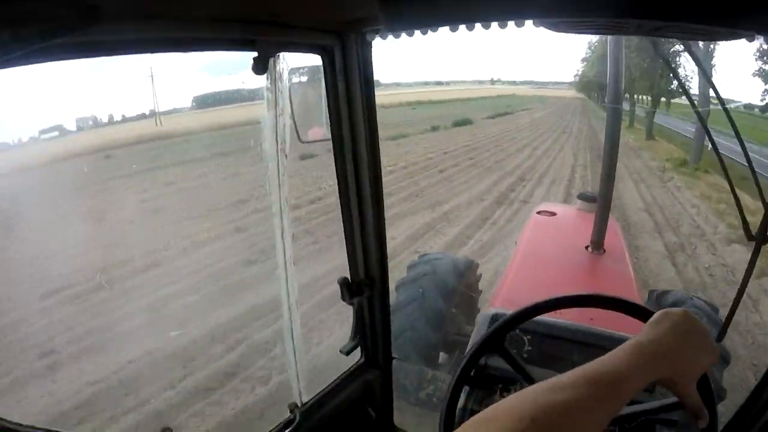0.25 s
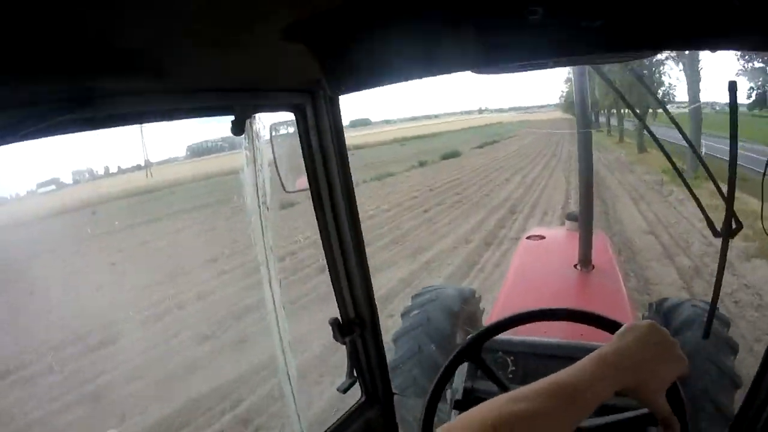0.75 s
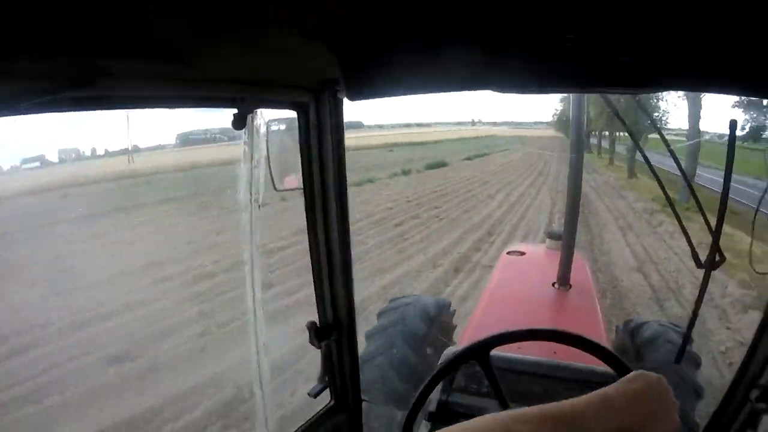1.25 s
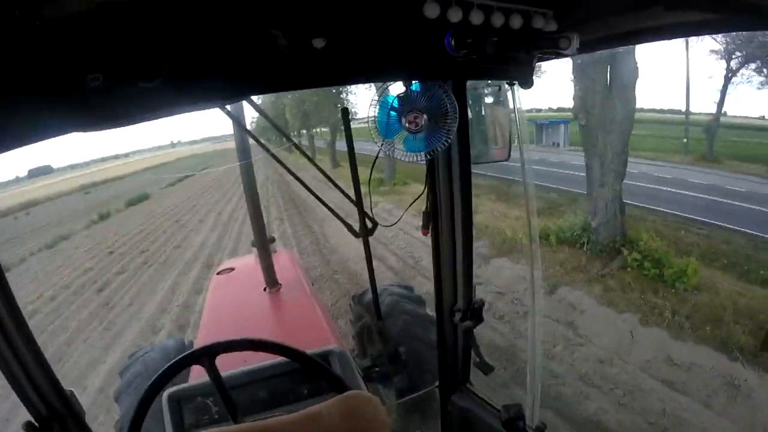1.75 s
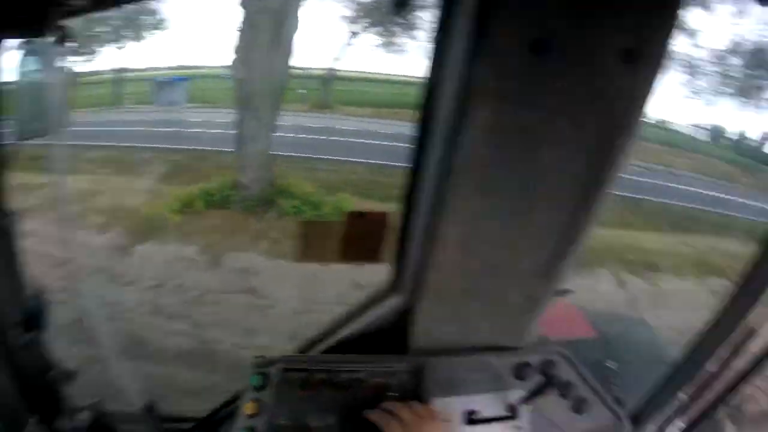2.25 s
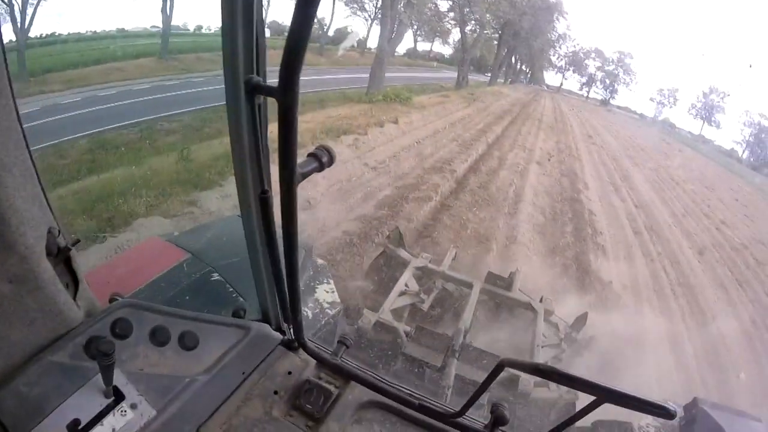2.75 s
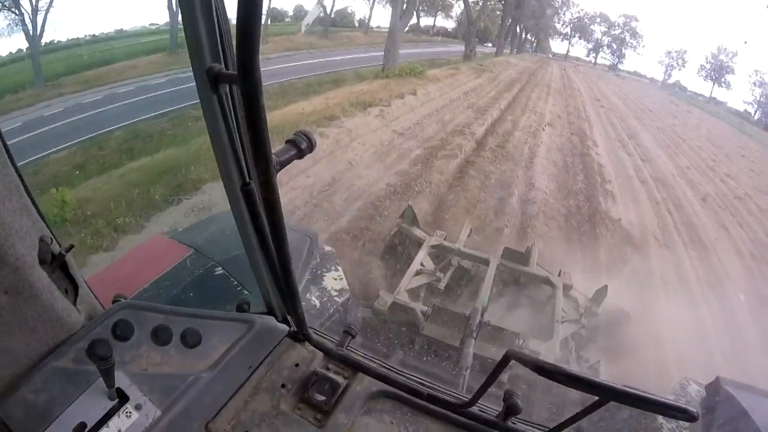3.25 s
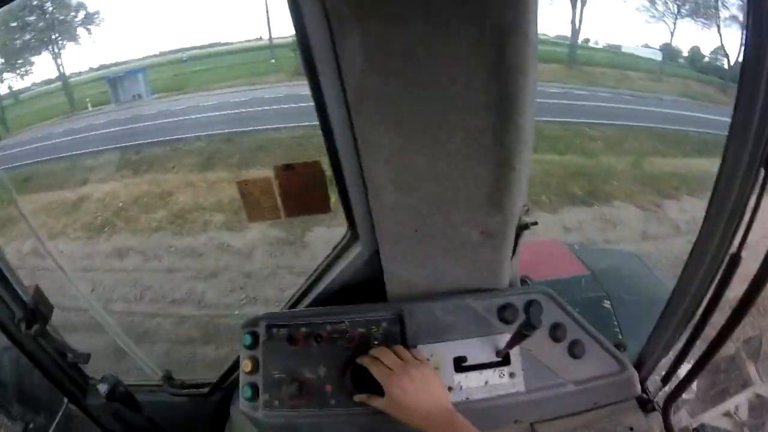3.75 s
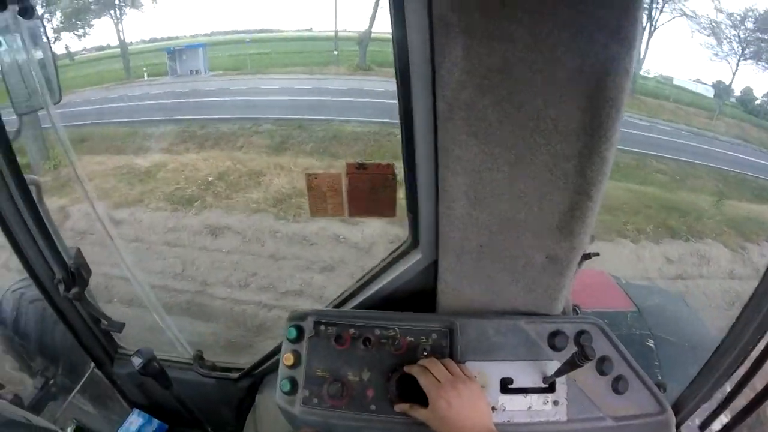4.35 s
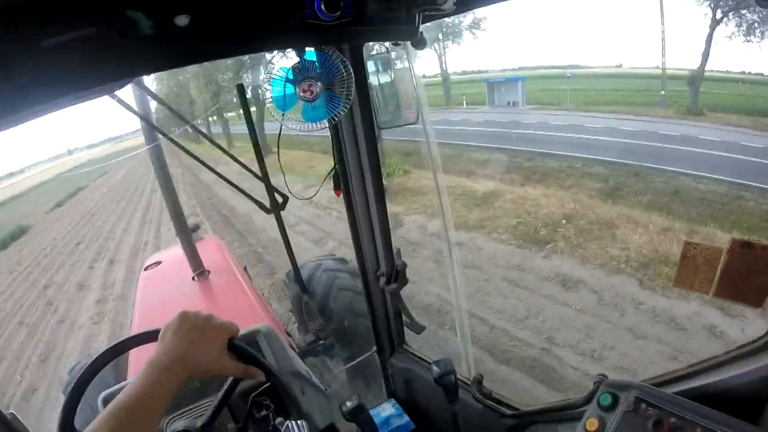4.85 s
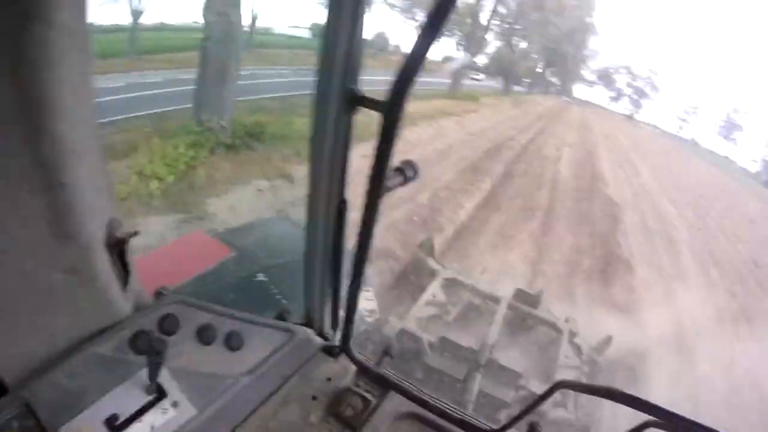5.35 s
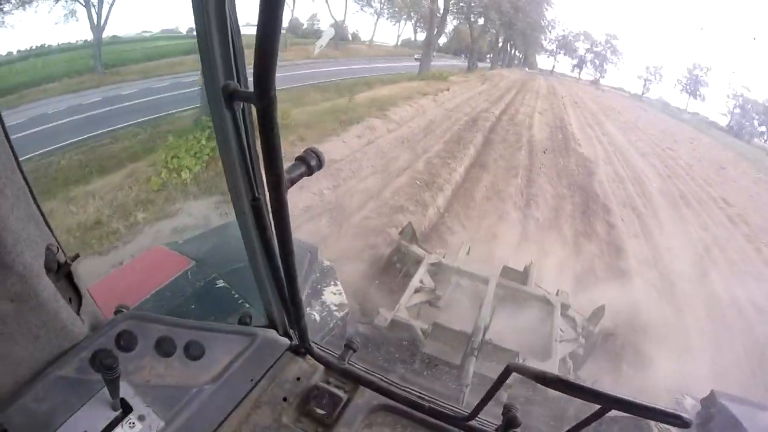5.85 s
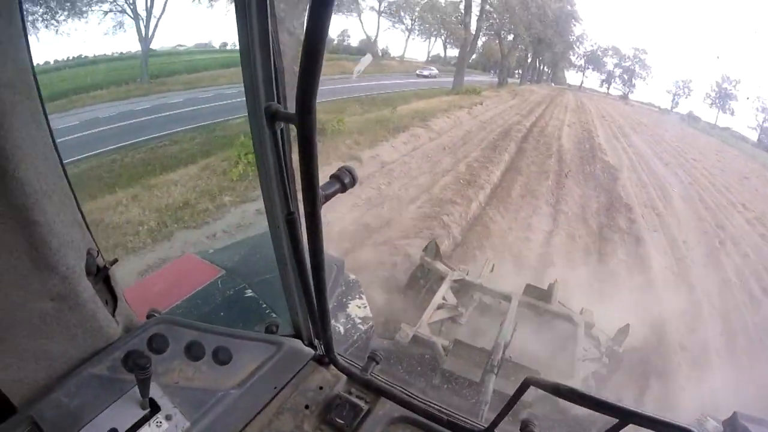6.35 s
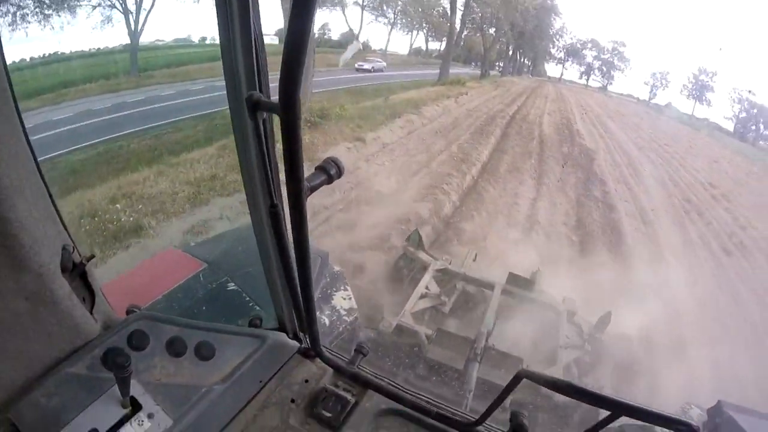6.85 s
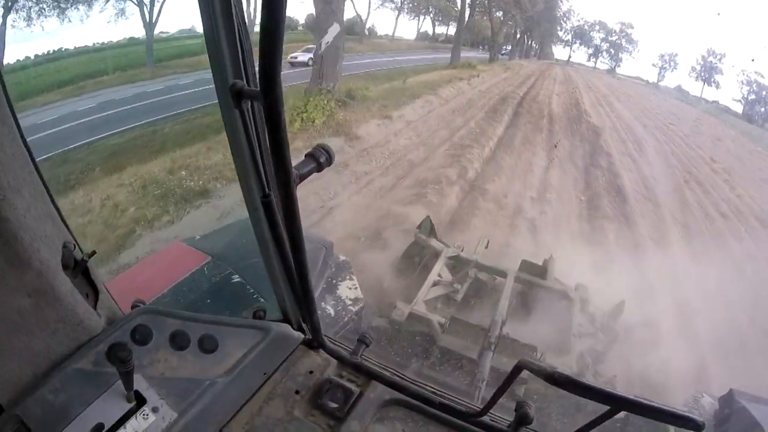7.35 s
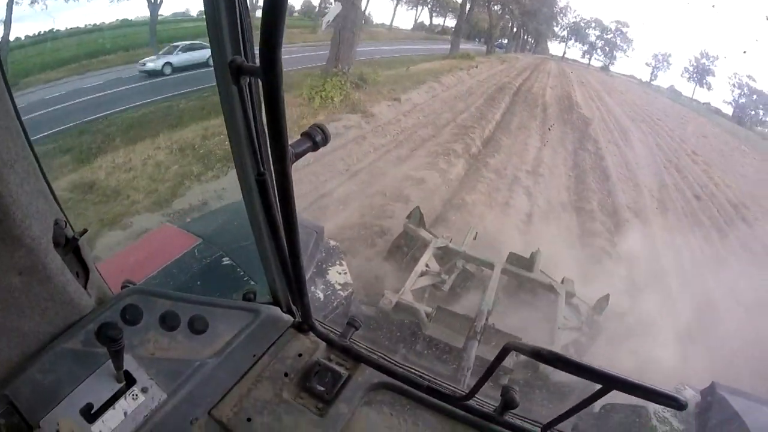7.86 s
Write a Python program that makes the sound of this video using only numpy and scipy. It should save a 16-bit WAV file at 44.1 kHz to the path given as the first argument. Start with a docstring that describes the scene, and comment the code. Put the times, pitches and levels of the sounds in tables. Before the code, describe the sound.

A head-worn microphone in a tractor cab picks up constant engine drone, dull knocking and boomy low throbs as a harrow is dragged over dry soil. Midrange hum leads early, then thins; whining gears shift with each turn of the head. Short dry rattles of trim and metal thicken after about five seconds. The high whine fades late, leaving drone, rumble and buzzing panels to the end.

```python
"""Inside a tractor cab, pulling a harrow over a dry field with the engine held near 1450 rpm.
At first the driver faces ahead: six-cylinder drone and clatter, strong transmission hum, rumbling soil.
Over two seconds the driver turns right, then by 3.4 s looks back, and the hum fades as other gears whine.
Near 4.8 s, half turned back to the right, the timing whine sinks; loose fittings rattle more thickly.
From 5.5 s the driver looks back to the end, and the high whine soon fades under drone and rumble."""
import sys
import numpy as np
from scipy import signal
from scipy.fft import rfft, irfft
from scipy.io import wavfile
from scipy.ndimage import uniform_filter1d, map_coordinates

SR = 44100
rng = np.random.default_rng(int(sys.argv[2]) if len(sys.argv) > 2 else 0)


def wav_record(signal):
    """Record a signal, one row per channel, as 16-bit PCM in the file named by sys.argv[1]."""
    frames = np.transpose(np.atleast_2d(signal))
    bounded = np.clip(frames, -1, 1)
    # unit amplitude maps onto the largest positive 16-bit level
    quanta = np.round(bounded * 32767).astype(np.int16)
    wavfile.write(sys.argv[1], SR, quanta)


N = 357210
T = np.arange(N) / SR  # seconds

# Engine speed, governed against the pull of the harrow. Each row: time in seconds, crankshaft speed in rpm.
ENGINE_SPEED = [(0, 1443), (0.5, 1436), (0.66, 1446), (0.85, 1442), (1.25, 1446), (1.48, 1436),
                (1.64, 1433), (1.82, 1457), (2.1, 1443), (2.4, 1446), (3.12, 1448), (3.3, 1442),
                (3.6, 1452), (3.75, 1446), (3.9, 1451), (4.08, 1445), (4.35, 1452), (4.48, 1447),
                (4.62, 1454), (4.82, 1445), (4.98, 1455), (5.15, 1451), (5.38, 1457), (5.67, 1451),
                (5.85, 1465), (6.05, 1444), (6.27, 1455), (6.48, 1446), (7.5, 1449), (8.1, 1447)]
# Drone lines. Each row: multiple of the four-stroke cycle rate, level in dB before throb and cab colour.
DRONE_LINES = [(2, -57), (3, -51), (4, -76.5), (5, -64.5), (6, -60), (7, -63), (8, -62), (9, -58),
               (10, -70.5), (11, -65), (12, -62.5), (13, -75), (14, -67.5), (15, -68), (16, -69),
               (17, -76.5), (18, -63.5), (19, -77), (20, -67), (21, -69), (22, -79.5), (24, -71.5),
               (30, -72), (32, -75.5), (57, -70), (58, -76), (63, -76), (66, -72.5), (69, -81), (71, -79),
               (75, -80), (76, -83.5), (82, -80.5), (88, -84.5), (101, -85.5)]
# Slow rise and fall of drone and boom. Each row: time in seconds, change in dB.
ENGINE_THROB = [(0, 0.5), (.55, 1), (1.2, .5), (1.8, 1), (2.5, 1.5), (3, -1), (3.6, 1.5), (4.3, 0), (5, 0),
                (5.6, -0.5), (5.9, -1), (6.5, -1), (7.1, 0.5), (7.7, -1), (8.1, 0)]
# Engine clatter through the cab walls. Each row: frequency in Hz, relative spectral level in dB.
CLATTER_COLOUR = [(200, -18.5), (290, -6), (400, -4.5), (460, 1.5), (540, -5), (690, 2.7), (820, -5),
                  (1000, -10.5), (1200, -15), (1600, -16), (2000, -13.5), (2400, -22.5), (2600, -32),
                  (2850, -35), (6000, -47.5)]
# Boom of the hollow cab. Each row: frequency in Hz, relative spectral level in dB.
BOOM_COLOUR = [(55, -15.0), (75, -4.5), (97, 0.0), (125, -4.5), (190, -15), (250, -23.5)]
# Transmission hum, strongest facing ahead. Each row: time in seconds, level in dB before waver and throb.
HUM_LEVEL = [(0, -58), (.4, -53), (1.2, -59), (1.7, -55), (2.05, -56.5), (2.7, -63.5), (4.3, -64.5),
             (4.8, -59.5), (5.1, -60), (5.35, -69.5), (8.1, -66)]
# Timing gear whine. Each row: time in seconds, level in dB before waver.
TIMING_LEVEL = [(0, -60), (.15, -55.5), (.26, -60.5), (.4, -58), (.8, -55), (1.0, -59), (1.4, -57),
                (1.9, -62), (2.1, -61.5), (2.36, -65), (2.48, -64), (2.58, -55.5), (3.15, -57.5),
                (3.45, -58), (3.7, -55), (3.88, -66), (4.02, -59), (4.15, -70), (4.28, -58.5), (4.42, -77),
                (4.64, -65), (4.74, -65), (4.81, -64), (4.9, -74), (5.2, -59.5), (5.28, -66), (5.42, -57),
                (6.1, -58), (6.5, -60.5), (6.8, -56), (7.22, -56.5), (7.34, -60), (7.48, -56), (8.1, -57.5)]
# Octave above the timing whine. Each row: time in seconds, level in dB before trim and waver.
OCTAVE_LEVEL = [(0, -70), (1.1, -79.5), (1.7, -74.5), (2.4, -69), (2.8, -78), (3.3, -69.5), (3.7, -74.5),
                (4.2, -72), (5.3, -76), (5.9, -79), (8.1, -79.5)]
# High gear whine. Each row: time in seconds, level in dB before trim, waver and tremble.
HIGH_LEVEL = [(0, -71), (.43, -74.5), (.87, -67.5), (1.45, -70.5), (1.67, -86), (1.8, -69), (2.05, -80),
              (2.32, -65), (2.44, -78), (2.5, -64), (2.68, -89), (2.91, -71), (3.0, -81), (3.36, -68),
              (3.5, -77), (3.59, -68.5), (3.68, -71), (3.8, -66), (3.95, -68), (4.13, -77), (4.3, -72.5),
              (4.5, -76), (4.65, -63.5), (4.88, -68.5), (5.13, -66), (5.25, -70.5), (5.37, -68),
              (5.66, -68.5), (5.8, -77), (7.35, -82), (7.5, -76.5), (8.1, -77.5)]
# Shaft and pump tones. Each row: multiple of the cycle rate, level in dB before cab colour, flutter as a share.
SHAFT_TONES = [(14.33, -66.5, .25), (28.67, -67.5, .4), (38.06, -66.3, .45), (57.4, -68.5, .55),
               (87, -78, .5), (117, -84, .5), (139, -85, .5), (156, -81, .9), (168, -81.5, .9),
               (208, -86.5, .4)]
# Swells of the low throb near 36 Hz. Each row: time of the peak in seconds, level in dB before cab colour.
LOW_SWELLS = [(0.5, -44.5), (0.95, -45), (1.33, -46), (1.73, -44.5), (2.4, -43), (2.65, -50.5), (3.05, -42),
              (3.45, -46.5), (3.82, -46), (4.1, -44), (4.45, -45), (4.87, -45.5), (5.62, -41.5),
              (6.28, -42), (6.55, -49.5), (6.94, -45), (7.38, -43.5), (7.58, -49.5), (7.75, -47.5)]
# Low throb. Each row: frequency in Hz, relative spectral level in dB.
LOW_COLOUR = [(10, -19.5), (15, -3.0), (24, -4.5), (35, -2.0), (46, -13.5)]
# Tyres, soil and air in the cab. Each row: frequency in Hz, relative spectral level in dB.
ROAR_COLOUR = [(20, -6.5), (55, -2), (125, 1.5), (190, 2.5), (240, -2), (320, -7.5), (680, -3.5),
               (1050, -16.5), (1600, -18.5), (2050, -14.5), (2700, -32.5), (4300, -46.5), (9000, -58.5)]
# Fine chatter of panels and trim. Each row: frequency in Hz, relative spectral level in dB.
FIZZ_COLOUR = [(1800, -7.5), (2800, -6), (3500, -0.5), (3900, 0), (4350, 4), (4900, -5), (5600, -6.5),
               (7000, -11.5), (9500, -20.5), (12000, -22.5), (15000, -34.5)]
# How loud that chatter is. Each row: time in seconds, level in dB before flicker and cab colour.
FIZZ_LEVEL = [(0, -82), (1.1, -80.5), (1.7, -80.5), (2.3, -80.5), (2.65, -77), (2.85, -78.5), (3.15, -77),
              (3.35, -75), (3.55, -77.5), (3.95, -78.5), (4.15, -79), (4.6, -79), (5.2, -78), (5.55, -77.5),
              (6.3, -77.5), (6.8, -76.5), (7.25, -76.5), (7.6, -76), (8.1, -78)]
# Buzz of glass and sheet metal. Each row: frequency in Hz, relative spectral level in dB.
PANEL_COLOUR = [(1600, -25.0), (1880, 3.0), (1960, -5), (2030, 3.0), (2200, -2.0), (2360, 1.0), (2600, -34.5)]
# Rattles of loose fittings. Each row: start in seconds, level in dB, length in seconds,
# brightness in dB per octave, ring in Hz.
FITTING_RATTLES = [(.986, -76, .022, 4, 3680), (1.462, -72.5, 0.01, 5, 9650), (1.565, -76, .016, 4, 4590),
                   (1.868, -75, .012, 3, 7580), (2.112, -69, 0.013, 1, 6890), (2.596, -72, .075, -6, 3680),
                   (3.06, -77, .01, 0, 6430), (3.11, -73, .026, -2, 3680), (3.355, -70, .014, -6, 3680),
                   (3.392, -66, .019, -6, 4360), (3.776, -73.5, .012, 2, 4360),
                   (3.922, -84, .012, 7, 10560), (3.97, -80, 0.039, 4, 4400), (4.254, -76, 0.021, 0, 3900),
                   (4.331, -63.5, .012, -14, 2600), (4.41, -74, 0.037, -4, 3900),
                   (4.678, -70, 0.022, 2, 4130), (5.137, -72.5, 0.011, 5, 5740),
                   (5.228, -74, .024, -6, 4130), (5.419, -75.5, 0.039, 4, 7800),
                   (5.635, -70, 0.018, -2, 7120), (5.661, -66, .021, -1.5, 3600),
                   (5.835, -65, .015, -11, 2300), (5.936, -74, .01, -10, 3450),
                   (5.986, -73, 0.035, 0, 4590), (6.12, -70, .018, 6, 5230), (6.153, -72, .015, -2, 4300),
                   (6.248, -72, 0.029, -1, 2990), (6.32, -74, .008, -3, 4300), (6.38, -80, .008, 4, 7120),
                   (6.439, -67, .011, -6, 4360), (6.51, -76, .02, 0, 4820), (6.578, -65, .014, -9, 4400),
                   (6.669, -63, .016, -9, 2900), (6.972, -67, 0.013, -7, 3700), (7.113, -74, .06, -3, 4130),
                   (7.283, -68.5, .015, -6, 4360), (7.301, -66.5, 0.027, -5, 3900),
                   (7.42, -66, .017, -8, 3680), (8.057, -84, .014, 8, 9000)]
# Small rattles from the rear of the cab. Middle level in dB facing ahead, facing right, facing back.
SMALL_RATTLE_LEVELS = (-89, -86, -80.5)
# Sound of fittings touching. Each row: frequency in Hz, relative spectral level in dB.
FITTING_COLOUR = [(900, -2.5), (2400, -2.5), (3400, 2), (3900, 2.5), (4350, 0.5), (4900, -1.5),
                  (5600, -2.5), (7500, -10), (10000, -17), (13000, -26), (15000, -34)]
# Where the driver looks. Each row: time in seconds, turn (0 ahead, 0.5 right, 1 back).
HEAD_TURN = [(0, 0.013), (1.3, 0.13), (1.55, 0.21), (2.05, 0.28), (2.28, 0.29), (2.5, 0.75), (3.4, 0.97),
             (3.7, 0.61), (4.35, 0.76), (4.65, 0.34), (5.05, 0.46), (5.25, 0.4), (5.48, 0.97), (8.1, 1)]
# Cab colour at the head. Each row: frequency in Hz, gain in dB facing ahead, facing right, facing back.
CAB_COLOUR = [(67.5, -5, -3, -3), (92.3, -2.5, -1, 3.3), (128, 0, 1, -4), (178, -5, 2.5, 1.5),
              (247, -4.5, -6, 2.5), (303, 4.5, -0.5, -0.5), (370, 1, -1, -1.4), (440, -1.5, 1.5, 0),
              (650, 1.5, 0, 0), (740, -3, -4.5, -1.7), (1110, -3, -1, -0.5), (1330, 2, 2, -1.5),
              (2020, -1, 0, 0), (2330, 1.5, -0.5, -1.5), (3000, 2, 0.4, 1.5), (3600, 3, -0.5, 4.5),
              (3900, 2, -0.5, -2), (4200, 3, -2.5, -1), (4700, 3, -3, -0.5), (5160, 2.5, -0.5, 1),
              (6500, 3, -0.5, -0.5), (7040, 2, 0.5, -2), (8000, 4, 1.5, 1), (9200, 7.5, -1, 2),
              (10500, 5.5, 1.5, 0), (11700, 3.5, -1.5, 1), (12800, 5, 3, 0)]

HARD_STROKE = .49  # place in the cycle (0-1) of the cylinder that fires harder than the rest
WAVER_DB, WAVER_HZ = 0.5, 5  # how far each gear level wavers with the load, and how fast
SWELL_RISE_S, SWELL_FALL_S, LOW_FLOOR_DB = 0.067, 0.12, -51.5  # the floor is the level between swells
EDGE_HZ, FADE_S = 15600, .004


def drone(cycles, scatter=0.3, scatter_rise=0.023, uneven=0.09):
    """Unequal cylinders sound every listed multiple of the cycle rate; low lines meet near the hard stroke."""
    lines = 0
    for multiple, db in DRONE_LINES:
        # phases spread further, in cycles, for the higher lines
        spread = min(scatter + scatter_rise * multiple, 1)
        lines = lines + amp(db) * tone(cycles - HARD_STROKE, multiple, .18, 3, spread)
    return -lines * (1 + uneven * wander(5.7))


def clatter(cycles, level_db=-58, repeat=0.46, knock=0.59, count=6, size=4096):
    """Each firing knocks the block: part of its ringing repeats every cycle, part is new."""
    white = irfft(np.exp(2j * np.pi * rng.random(size // 2 + 1)))
    one_cycle = coloured(white, [(20, 0), (5000, 0)])
    repeated = evened(map_coordinates(one_cycle, [cycles % 1 * size], order=3, mode="grid-wrap"))
    fresh = coloured(noise(), [(20, 0), (5500, 0)])
    ringing = np.sqrt(repeat) * repeated + np.sqrt(1 - repeat) * fresh
    firing = cycles * count
    # each cylinder knocks with its own strength
    cylinders = rng.permutation(np.geomspace(.15, 1.3, count))
    strength = cylinders[firing.astype(int) % count]
    blows = 1 + knock * strength * np.exp(-(firing % 1) / .3)
    return amp(level_db) * coloured(ringing * blows, CLATTER_COLOUR)


def boom(cycles, low_db, level_db=-62.0, follow=0.22, throb_db=4.0):
    """The hollow cab thumps at each hard stroke of the engine, and more so in a swell of the low throb."""
    thumps = coloured(noise(), BOOM_COLOUR)
    throb = throb_db * np.cos(2 * np.pi * (cycles - HARD_STROKE))
    return amp(level_db) * evened(thumps * amp(throb + follow * low_db))


def gears(cycles, neighbour=22.35, neighbour_db=-13, octave_db=-2.0, high_db=4.0,
          hum_throb=0.26, hum_lag=0.52, runout=0.17):
    """Meshing teeth set up standing waves in the cab, through which the driver's head moves."""
    hum, timing, octave, high = [gear_level(table)
                                 for table in (HUM_LEVEL, TIMING_LEVEL, OCTAVE_LEVEL, HIGH_LEVEL)]
    # the hard stroke jerks the transmission, where two gears of nearly equal pitch beat together
    hum = hum * (1 + hum_throb * np.cos(2 * np.pi * (cycles - HARD_STROKE - hum_lag)))
    pair = tone(cycles, 22.92, .45, 17) + amp(neighbour_db) * tone(cycles, neighbour, .45, 8.1)
    timing_whine = timing * tone(cycles, 52, .13, 12)
    octave_whine = amp(octave_db) * octave * tone(cycles, 104, .4, 14)
    # the high gear runs slightly off centre, so its whine trembles with each turn of the crankshaft
    tremble = 1 + runout * np.cos(2 * np.pi * 2 * cycles)
    high_whine = amp(high_db) * high * tremble * tone(cycles, 146, .27, 26)
    return hum * pair + timing_whine + octave_whine + high_whine


def gear_level(table, glide_s=0.055):
    """A gear's drawn level as a gain, smoothed into glides and wavering with the load."""
    glide = uniform_filter1d(amp(curve(table)), round(glide_s * SR))
    return glide * amp(WAVER_DB * wander(WAVER_HZ))


def shafts(cycles):
    """Pumps and shafts geared to the engine add fainter, fluttering tones."""
    return sum(amp(db) * tone(cycles, multiple, flutter, 4.6) for multiple, db, flutter in SHAFT_TONES)


def rattles(small_spread_db=2, small_s=0.023, small_bright_db=-2, small_hz=4500,
            spread_octaves=.5, count=32):
    """Hard jolts set the fittings rattling, over a scatter of small rattles throughout."""
    near = facing(SMALL_RATTLE_LEVELS)
    small = []
    for i, (when, force, pitch) in enumerate(rng.random((count, 3))):
        at = int((i + when) * N / count)
        db = near[at] + small_spread_db * (2 * force - 1)
        hz = small_hz * 2 ** (spread_octaves * (2 * pitch - 1))
        small.append((at / SR, db, small_s, small_bright_db, hz))
    out = np.zeros(N)
    for start, *row in list(FITTING_RATTLES) + small:
        sound = rattle(*row)
        part = out[round(start * SR):][:len(sound)]
        part += sound[:len(part)]
    return out


def rattle(db, length, bright_db, hz, rise_s=0.00091, tail_s=0.035, tail_db=-13,
           ring_db=-8, metal_db=-9, metal_hz=4380, clump_db=3, size=8192):
    """A fitting chatters in tiny contacts and rings at its own pitch; the metal frame rings along."""
    t = np.arange(size) / SR
    hard = rng.random(size) < 700 / SR  # about 700 harder contacts a second
    clumps = amp(clump_db * evened(uniform_filter1d(rng.standard_normal(size), size=90)))
    touches = rng.standard_normal(size) * (1 + 3.0 * hard) * clumps
    contacts = coloured(touches, FITTING_COLOUR, bright_db)
    ring = resonance(contacts, hz, 700)
    metal = resonance(contacts, metal_hz, 170)
    body = np.exp(-(t / length) ** 4)
    tail = amp(tail_db) * np.exp(-t / tail_s)
    jolt = (1 - np.exp(-t / rise_s)) * (body + tail)
    return amp(db) * jolt * evened(contacts + amp(ring_db) * ring + amp(metal_db) * metal)


def cab(low_db, roar_db=-57, swell_db=0.04, flicker_db=0.82, steady=0.27):
    """A low throb swells under the roar of tyres and soil through the floor and the chatter of the trim."""
    low = coloured(noise(), LOW_COLOUR)
    # partly level out the chance rise and fall of the low noise
    height = uniform_filter1d(abs(signal.hilbert(low)), size=1500)
    low = evened(low / height ** steady)
    roar = coloured(noise(), ROAR_COLOUR) * amp(swell_db * wander(6.8))
    fizz = coloured(noise(), FIZZ_COLOUR)
    fizz_db = curve(FIZZ_LEVEL) + flicker_db * wander(9.4)
    return low * amp(low_db) + roar * amp(roar_db) + fizz * amp(fizz_db)


def low_level():
    """How loud the low throb is, in dB: its floor or a swell, whichever is higher."""
    level = np.full(N, amp(LOW_FLOOR_DB))
    for peak, db in LOW_SWELLS:
        swell = np.exp(-((T - peak) / np.where(T < peak, SWELL_RISE_S, SWELL_FALL_S)) ** 2)
        level = np.maximum(level, amp(db) * swell)
    return 20 * np.log10(level)


def panels(level_db=-73.5, patchy_db=2.5):
    """Glass and sheet metal buzz in narrow bands of noise, unevenly from moment to moment."""
    buzz = coloured(noise(), PANEL_COLOUR)
    return amp(level_db) * evened(buzz * amp(patchy_db * wander(20)))


def ticks(level_db=-88, per_s=60, decay_s=0.01, size=1024):
    """The trim keeps ticking faintly: chance hits, each a short dying burst of noise."""
    hits = (rng.random(N) < per_s / SR) * rng.random(N) ** 2
    bursts = signal.oaconvolve(hits, np.exp(-np.arange(size) / SR / decay_s))[:N]
    return amp(level_db) * coloured(bursts * noise(), FITTING_COLOUR)


def head(x, ripple_db=1.0, size=2048):
    """Turning the head changes the cab's colour and the fine ripple of reflections off the glass."""
    padded = np.pad(x, size, "reflect", reflect_type="odd")
    hz, t, spectrum = signal.stft(padded, SR, nperseg=size)
    turn = np.interp(t - size / SR, *np.transpose(HEAD_TURN))
    # crossfade between ahead, right and back
    weights = np.array([np.interp(turn, [0, .5, 1], side) for side in np.eye(3)])
    points, *facings = np.transpose(CAB_COLOUR)
    colours = np.array([np.interp(np.log(hz + 1), np.log(points), db) for db in facings])
    ripple = evened(uniform_filter1d(rng.standard_normal(colours.shape), size=10, axis=1))
    colours += ripple_db * ripple * np.minimum(hz / 2500, 1)  # full depth from 2500 Hz up
    shaped = signal.istft(spectrum * amp(colours.T @ weights), SR, nperseg=size)[1]
    return shaped[size:size + N]


def facing(by_direction):
    """Follows a value given for ahead, right and back as the driver turns."""
    return np.interp(curve(HEAD_TURN), [0, .5, 1], by_direction)


def tone(cycles, multiple, flutter, flutter_hz, scatter=1):
    """A line locked to the crankshaft, at rms 1; the uneven load stirs its height and phase."""
    stir = 1 + flutter * (wander(flutter_hz) + 1j * wander(flutter_hz)) / np.sqrt(2)
    phase = multiple * cycles + scatter * (rng.random() - .5)
    return evened((stir * np.exp(2j * np.pi * phase)).real)


def resonance(x, hz, width_hz):
    """What a single resonance picks out of x, at rms 1."""
    return evened(signal.lfilter(*signal.iirpeak(hz, hz / width_hz, SR), x))


def coloured(x, points, tilt_db=0):
    """Gives x a spectrum, tilted by some dB an octave, at rms 1."""
    hz, db = np.transpose(points)
    octave = np.log2(np.fft.rfftfreq(len(x), 1 / SR) + 1)
    # past either end of the points the level falls 20 dB an octave
    beyond = abs(octave - np.clip(octave, np.log2(hz[0]), np.log2(hz[-1])))
    gain = amp(np.interp(octave, np.log2(hz), db) - 20 * beyond + tilt_db * octave)
    return evened(irfft(rfft(x) * gain, len(x)))


def wander(hz):
    """Slow chance of rms 1, up to about hz."""
    f = np.fft.rfftfreq(N, 1 / SR)
    return evened(irfft(rfft(noise()) * np.exp(-(f / hz) ** 2), N))


def noise():
    """White noise for the whole scene."""
    return rng.standard_normal(N)


def curve(table):
    """A timed table drawn out sample by sample."""
    return np.interp(T, *np.transpose(table))


def evened(x):
    """Scales to rms 1."""
    return x / np.sqrt(np.mean(x ** 2) + 1e-20)


def amp(db):
    """Decibels to gain."""
    return 10 ** (np.asarray(db) / 20)


def scene():
    """One engine speed drives everything that turns; the running noise takes the cab's colour at the head."""
    cycles = np.cumsum(curve(ENGINE_SPEED) / 120) / SR  # two turns of the crankshaft per cycle
    low_db = low_level()
    low_engine = amp(curve(ENGINE_THROB)) * (drone(cycles) + boom(cycles, low_db))
    engine = low_engine + clatter(cycles) + shafts(cycles)
    running = engine + cab(low_db) + panels() + ticks()
    return (head(running) + gears(cycles) + rattles())[None]


def record(dry):
    """A steep low-pass takes off the top treble; short fades start and stop the sound without a click."""
    ends = np.minimum(np.minimum(T, T[::-1]) / FADE_S, 1)
    low_pass = signal.firwin(511, EDGE_HZ, window=("kaiser", 9), fs=SR)
    return signal.oaconvolve(dry * ends, low_pass[None], "same")


dry = scene()
out = record(dry)
wav_record(out)
```